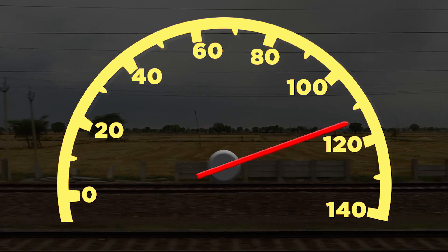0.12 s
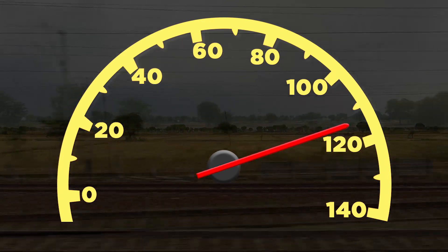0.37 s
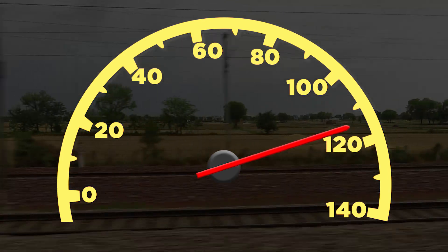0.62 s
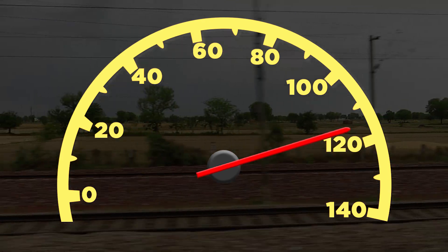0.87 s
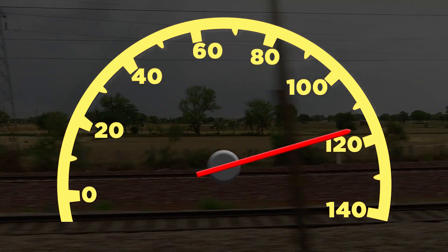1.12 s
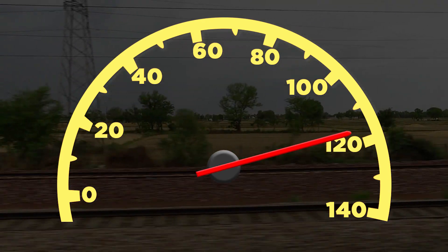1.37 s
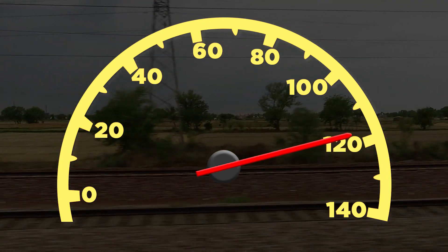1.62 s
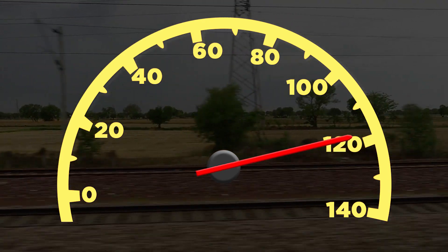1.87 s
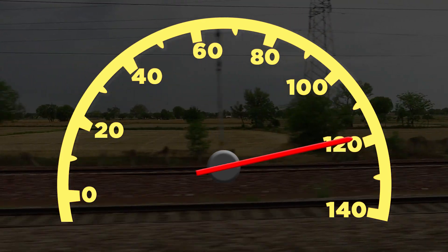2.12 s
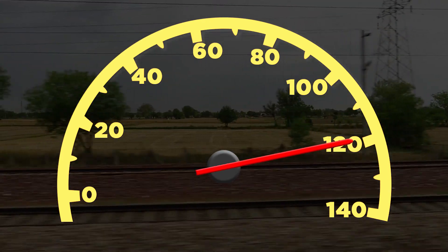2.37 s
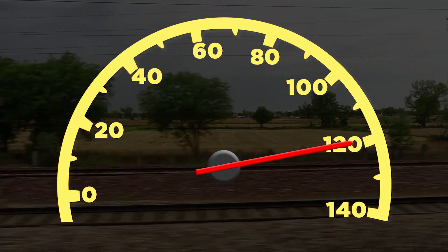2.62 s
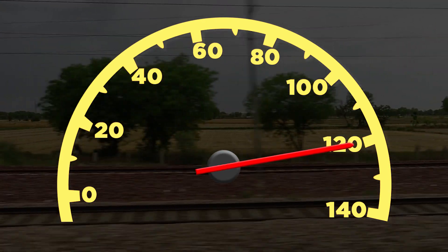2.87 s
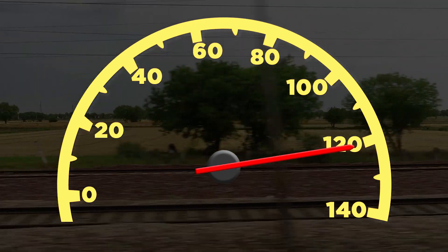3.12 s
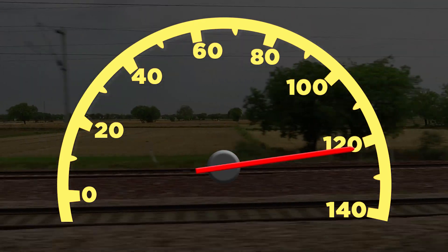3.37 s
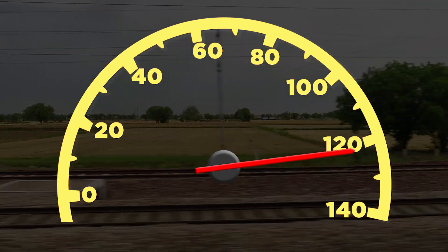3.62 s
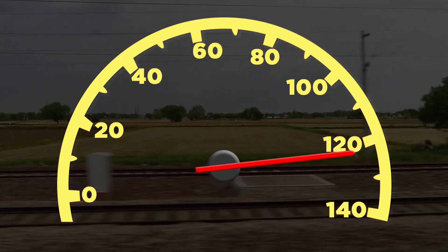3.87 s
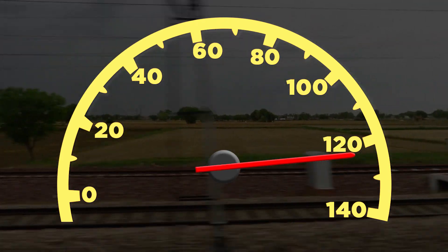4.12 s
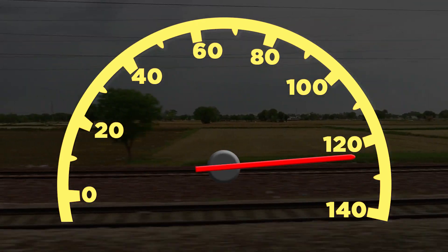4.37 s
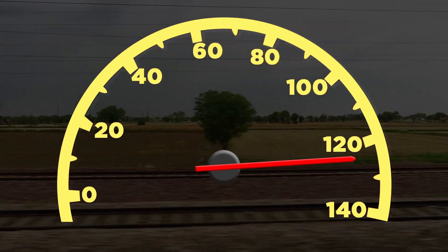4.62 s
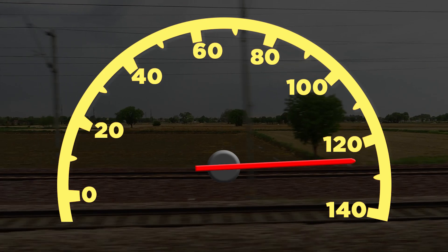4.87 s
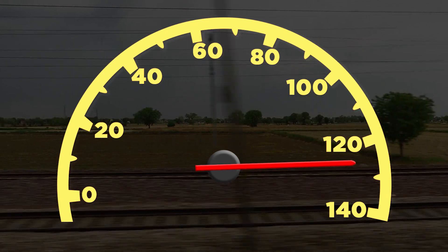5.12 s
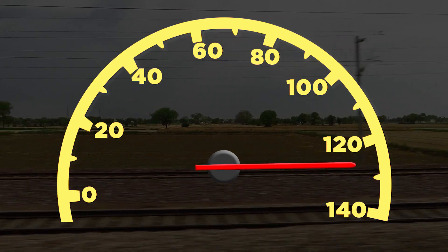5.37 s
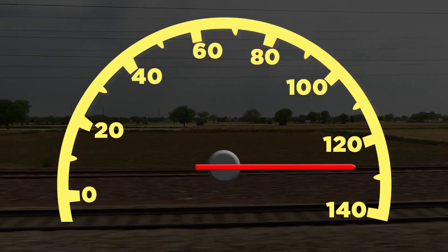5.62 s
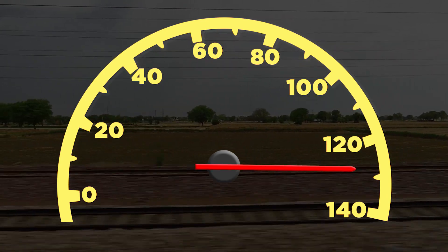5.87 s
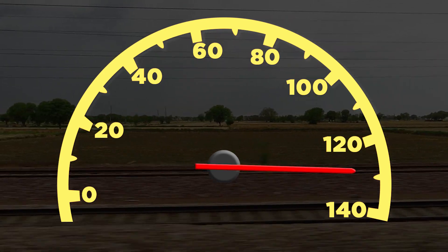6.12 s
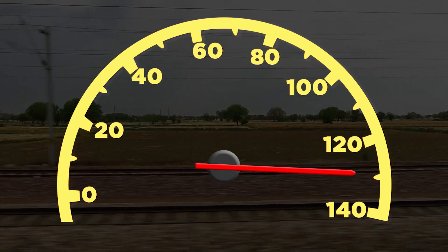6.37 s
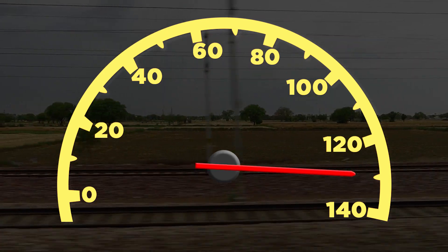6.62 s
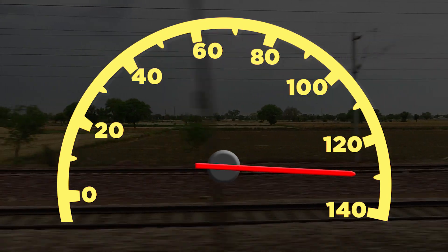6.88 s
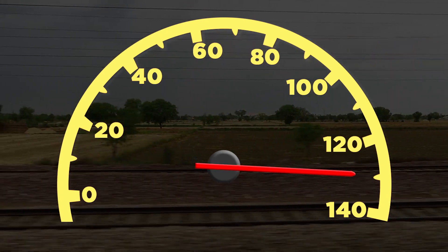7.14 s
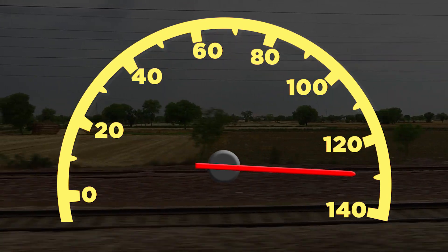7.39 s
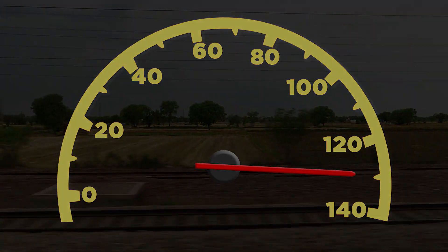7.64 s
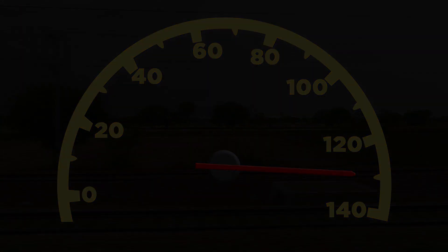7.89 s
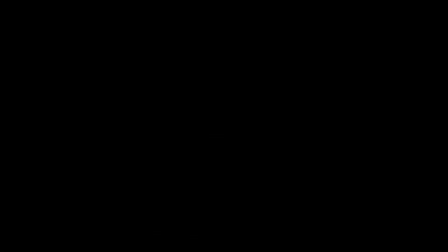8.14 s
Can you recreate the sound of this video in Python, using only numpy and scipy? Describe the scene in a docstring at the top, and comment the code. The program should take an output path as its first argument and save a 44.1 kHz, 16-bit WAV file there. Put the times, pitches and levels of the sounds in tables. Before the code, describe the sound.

Continuous engine noise from a powerful diesel train at full load: fast low exhaust pulses, buzzing gears, humming pumps and fans, and rushing machine noise. A piercing, steady-pitched turbo whistle waxes and wanes over it with airy high hiss. The microphone is close to the machinery, the image narrow and without noticeable echo. The sound holds steady, then fades out around eight seconds.

```python
"""A deep, fast throb leads: a big diesel locomotive engine at steady full load, heard close by, fading at the end.
Exhaust, gear and pump tones are sums of sines, most of them on multiples of the engine cycle.
The turbocharger whines with sines on its own shaft speed, under a resonant noise hiss near 8.3 kHz.
A broad machine roar of filtered noise fills in between, swelling band by band, in nearly mono stereo."""
import sys
import numpy as np
from scipy import signal
from scipy.fft import rfft, irfft, next_fast_len
from scipy.io import wavfile
from scipy.ndimage import map_coordinates

SR = 44100
rng = np.random.default_rng(int(sys.argv[2]) if len(sys.argv) > 2 else 0)


def natural_amplitude(level_db):
    """Convert a level in decibels to a linear amplitude factor, elementwise."""
    exponent = np.asarray(level_db, float) / 20
    return 10 ** exponent


def bounce(signal):
    """Save signal as a 16-bit WAV file at the path given by the first command-line argument."""
    frames = np.transpose(np.atleast_2d(signal))
    limited = np.clip(frames, -1, 1)
    pcm = np.round(limited * 32767).astype(np.int16)
    wavfile.write(sys.argv[1], SR, pcm)


N = 364266
T = np.arange(N) / SR
M = next_fast_len(N)  # spectrum length, samples
HZ = np.maximum(np.arange(M // 2 + 1) * SR / M, 1)  # frequency of each spectrum bin
CYCLE_HZ = 9.4404  # engine cycles per second


def on_bins(hz, value):
    """A curve over frequency, read at every spectrum bin along a logarithmic pitch axis."""
    return np.interp(np.log(HZ), np.log(hz), value)


def walk(rate_hz):
    """Smooth random drift through about rate_hz new values a second, with a spread near 1."""
    count = int(N / SR * rate_hz) + 4
    values = rng.standard_normal(count)
    drift = map_coordinates(values, [1 + T[::64] * rate_hz], order=3)
    return drift.repeat(64)[:N]


def tones(rows, turns, wander_db, rate_hz, lag=None):
    """Sines on multiples of a turning phase, each wavering in level; random phases unless a lag is given."""
    out = np.zeros(N)
    for multiple, level_db in rows:
        start = rng.uniform(0, 2 * np.pi)
        if lag is not None:
            start = lag(multiple)
        gain = np.sqrt(2) * natural_amplitude(level_db + wander_db * walk(rate_hz))
        out += gain * np.cos(2 * np.pi * multiple * turns + start)
    return out


def duct_lag(order):
    """Exhaust phase: orders below the duct resonance lead, those above lag, so each cycle starts sharply
    and dies away."""
    duct_hz, duct_width_hz = 77.5, 9.0
    if order == 16:
        # the firing wave steepens like a saw, which ties order 16 a quarter turn to order 8
        return 2 * duct_lag(8) + np.pi / 2
    # doubled for two silencer chambers in a row
    return -2 * np.arctan(2 * (order * CYCLE_HZ - duct_hz) / duct_width_hz)


def exhaust(cycle):
    """Exhaust and block tones on the engine orders; the low ones and order 16 take their phase from the duct."""
    # exhaust and block tones before the layer gain: order [multiple of the cycle rate], level_db [dB rms]
    firing = [(4, -57), (5, -48), (6, -44), (7, -36), (8, -17), (9, -21), (10, -34), (12, -37), (14, -46),
              (15, -37), (16, -32), (17, -41), (19, -42), (20, -48), (22, -43), (23, -35), (24, -42),
              (25, -42), (30, -48), (32, -49), (33, -48), (34, -45), (38, -49), (41, -47), (42, -56),
              (43, -54), (44, -52), (45, -55), (49, -56)]
    ducted = [row for row in firing if row[0] <= 12 or row[0] == 16]
    loose = [row for row in firing if row[0] > 12 and row[0] != 16]
    throb = tones(ducted, cycle, wander_db=0.25, rate_hz=3.0, lag=duct_lag)
    upper = tones(loose, cycle, wander_db=0.6, rate_hz=3.0)
    return natural_amplitude(0.36) * (throb + upper)


def gear_train(cycle):
    """Gear teeth sing on high multiples of the cycle; one group lines up into a surge once per cycle."""
    # gear train tones before the layer gain: order [multiple of the cycle rate], level_db [dB rms]
    gear_tones = [(60, -48), (63, -50), (65, -48), (66, -44), (68, -45), (70, -41), (71, -41), (72, -45),
                  (74, -36), (75, -44), (77, -44), (79, -27), (80, -37), (81, -42), (82, -49), (83, -42),
                  (84, -49), (88, -48), (91, -48), (92, -44), (95, -50), (96, -50), (99, -50), (100, -48),
                  (105, -50), (113, -42), (157, -50), (158, -49)]
    # driven shaft tones before the layer gain: order [multiple of the shaft's own rate], level_db [dB rms]
    driven_tones = [(54, -49), (55, -42), (56, -43), (57, -42), (59, -38), (60, -41), (81, -42), (82, -48),
                    (115, -51)]
    low, high = 74, 83  # orders of the surging group
    surge_cycle = 0.9  # point of each cycle where they line up
    twisted = cycle + 0.0015 * walk(0.6)  # the gear train winds up and lets go a little
    surging = [row for row in gear_tones if low <= row[0] <= high]
    steady = [row for row in gear_tones if not low <= row[0] <= high]
    surge = tones(surging, twisted, wander_db=0.6, rate_hz=4.0,
                  lag=lambda order: -2 * np.pi * order * surge_cycle)
    gears = tones(steady, twisted, wander_db=0.6, rate_hz=4.0)
    driven = tones(driven_tones, cycle * 79 / 58, wander_db=0.8, rate_hz=4.0)  # geared 79:58 to the cycle
    return natural_amplitude(0.9) * (surge + gears + driven)


def engine():
    """Exhaust and gears locked to the engine cycle, plus auxiliaries humming at fixed pitches."""
    # pumps and fans on their own speeds: pitch_hz [Hz], level_db [dB rms]
    auxiliaries = [(115.5, -38.5), (173.6, -36.5), (286.7, -36.5), (346.5, -45.5), (761.7, -45.5)]
    cycle_start_s = 0.006
    cycle = CYCLE_HZ * (T - cycle_start_s)
    return exhaust(cycle) + gear_train(cycle) + tones(auxiliaries, T, wander_db=0.86, rate_hz=2.0)


def blade(turns, level_db, rock, flutter):
    """A blade or tooth tone that the engine cycle rocks in phase and level, fluttering in the air stream."""
    rock_lean = 1.05  # radians: 0 rocks the level alone, a quarter turn the phase alone
    start = rng.uniform(size=20)
    sides = 0
    for offset, side_db in rock:
        # opposite offsets share one starting point of the rocking
        rocking = offset * CYCLE_HZ * T + np.sign(offset) * start[abs(offset)]
        sides = sides + np.exp(1j * rock_lean) * natural_amplitude(side_db) * np.exp(2j * np.pi * rocking)
    shaky = np.exp(1j * 0.25 * walk(30.0) + flutter * walk(55.0))  # phase, then level
    carrier = np.exp(2j * np.pi * turns)
    return np.sqrt(2) * natural_amplitude(level_db) * np.real((1 + sides) * shaky * carrier)


def turbo_whine():
    """Free-running turbocharger shaft: two bladed wheels, a tooth tone and weaker multiples of its speed."""
    # levels before rocking and flutter, waxing and waning apart:
    # time_s [s], blades_34_db [dB rms], blades_53_db [dB rms], teeth_29_db [dB rms]
    tone_levels = [(0.0, -29, -37, -49), (0.6, -29.5, -41, -50), (1.0, -34, -38, -53),
                   (1.25, -33.5, -35.5, -54), (1.6, -32, -34.5, -51), (2.0, -32, -35, -51),
                   (2.35, -32, -29.5, -47), (2.8, -34, -33, -49.5), (3.4, -32.5, -32, -44.5),
                   (4.1, -31.5, -40, -47.5), (4.45, -36.5, -40.5, -45.5), (4.85, -35.5, -36, -48),
                   (5.03, -45.5, -40.5, -48.5), (5.17, -37.5, -36.5, -46), (5.35, -33, -36.5, -46.5),
                   (5.8, -35.5, -37.5, -46), (6.1, -31.5, -39.5, -47), (6.6, -36, -37, -47),
                   (7.1, -38.5, -37.5, -53), (7.6, -34, -38, -49)]
    # other shaft tones: multiple [of the shaft rate], level_db [dB rms]
    shaft_tones = [(1, -37), (17, -47), (57.48, -62), (68, -69)]
    # side tones by which the firings rock each tone: offset [cycle rates], level_db [dB against the tone]
    rock_34 = [(-18, -26), (-13, -26), (-8, -24), (-7, -26), (-3, -21), (-1, -13), (1, -22), (8, -17),
               (11, -19)]
    rock_53 = [(-16, -19), (-8, -14), (8, -9), (16, -20)]
    rock_29 = [(-11, -8), (-8, -13), (11, -14)]
    shaft_hz, wander_hz = 157.64, 0.03  # turns per second, and their slow drift
    turns = np.cumsum(shaft_hz + wander_hz * walk(0.99)) / SR
    time_s, *columns = np.transpose(tone_levels)
    first_db, second_db, tooth_db = (np.interp(T, time_s, column) for column in columns)
    whine = blade(34 * turns, first_db, rock_34, flutter=0.08)
    whine += blade(53 * turns, second_db, rock_53, flutter=0.38)
    whine += blade(29.07 * turns, tooth_db, rock_29, flutter=0.25)
    return whine + tones(shaft_tones, turns, wander_db=2.1, rate_hz=3.1)


def resonant_hiss():
    """Hiss rings in a resonance near 8.3 kHz, falls away above it and pulses with the engine cycle."""
    # hiss level before pulsing: time_s [s], level_db [dB rms]
    hiss_levels = [(0.0, -39), (0.55, -40), (1.0, -37.5), (1.9, -37), (2.35, -35), (2.8, -36.5), (4.0, -37),
                   (5.2, -37.5), (5.6, -40), (5.85, -39), (7.6, -40)]
    centre_hz, width_hz = 8330.0, 300.0
    hiss_db = np.interp(T, *np.transpose(hiss_levels))
    peak = 1 / (1 + 2j * (HZ - centre_hz) / width_hz)
    peak = peak / (1 + (HZ / 9600.0) ** 8)  # trims the skirt above the resonance
    hiss = irfft(rfft(rng.standard_normal((2, M))) * peak)[:, :N]
    pulse_db = 0.9 * walk(40.0) + 0.4 * np.cos(2 * np.pi * CYCLE_HZ * (T - 0.07))
    common, apart = hiss / hiss.std() * natural_amplitude(hiss_db + pulse_db)
    return common, apart, hiss_db - np.mean(hiss_db)  # last: the slow swing of the hiss in dB


def roar(effort_db):
    """Octave bands of noise that swell apart and puff with the firings; the top follows the hiss level."""
    # exhaust and body noise before casing and swell: pitch_hz [Hz], density_db [dB per Hz]
    rumble_curve = [(22, -60.5), (35, -64), (50, -60), (75, -50), (105, -55), (130, -55.5), (190, -52.5),
                    (250, -56.5), (340, -58.5), (440, -66.5), (492, -68.5), (530, -62.5), (740, -52.5),
                    (1050, -60), (1240, -72)]
    # fan and intake noise before casing and swell: pitch_hz [Hz], density_db [dB per Hz]
    fan_curve = [(1240, -74), (1500, -60.5), (1850, -64), (2020, -72), (2350, -61.5), (2650, -60),
                 (2820, -64.5), (3300, -65.5), (4000, -72.5), (5000, -75), (7000, -85.5), (9500, -91.5),
                 (11500, -90), (12500, -99), (15500, -96)]
    # narrow casing resonances excited by the noise: pitch_hz [Hz], width_hz [Hz], gain_db [dB, each alone]
    casing = [(746, 20, 7), (1044, 27, 1), (1410, 110, 5.5), (5410, 96, 10.5), (5940, 250, -0.5),
              (6200, 180, 4.5), (12650, 300, 6), (13350, 440, 9), (14000, 350, 3)]
    rumble_db = on_bins(*np.transpose(rumble_curve))
    fan_db = on_bins(*np.transpose(fan_curve))
    density_db = np.where(HZ < fan_curve[0][0], rumble_db, fan_db)
    ring = 1
    for pitch_hz, width_hz, gain_db in casing:
        ring = ring + (natural_amplitude(gain_db) - 1) / (1 + (2 * (HZ - pitch_hz) / width_hz) ** 2)
    # the square root turns unit white noise into unit power per Hz
    noise = rfft(rng.standard_normal((2, M))) * natural_amplitude(density_db) * ring * np.sqrt(SR / 2)
    puff = np.cos(2 * np.pi * 8 * CYCLE_HZ * T)
    shared = walk(9.0)
    out = 0
    for centre_hz in 30 * 2.0 ** np.arange(10):
        # neighbouring octaves crossfade
        share = np.cos(np.pi / 2 * np.clip(np.log2(HZ / centre_hz), -1, 1)) ** 2
        swell_db = 0.18 * shared + 0.72 * walk(12.0) + 0.28 * puff
        swell_db = swell_db + np.clip(centre_hz / 5900.0, 0, 1) * effort_db
        out = out + irfft(noise * share)[:, :N] * natural_amplitude(swell_db)
    return out


def scene():
    """Nearly mono stereo: a filtered copy of the centre and some other noise make the sides."""
    # half the left-right difference against the centre; some bands are almost mono:
    # pitch_hz [Hz], in_step [share], quarter [share, a quarter turn ahead], unrelated_db [dB, noise gain]
    stereo_width = [(40, .01, -0.0041, -14.5), (100, 0, -0.044, -30), (347, -0.052, -0.063, -18),
                    (504, -.1, -.01, -17.5), (750, -.15, -.01, -22.5), (1215, -0.058, -.01, -18.5),
                    (1300, 0, 0, -42.5), (1680, -0.019, 0, -28.5), (1860, -0.11, -0.17, -18),
                    (2050, 0.204, 0.4, -10), (2280, -0.011, 0, -38.5), (3200, -0.016, -.02, -24),
                    (4000, 0, -0.088, -29), (4250, .09, 0.2, -14), (4800, 0.043, 0.34, -19),
                    (5200, 0, 0, -3.5), (6100, -0.065, 0, -23.5), (7000, 0, 0, -32),
                    (7700, -.05, -.3, -13.5), (8800, -.05, -0.27, -15), (9300, 0, 0, -21.5),
                    (12200, 0.021, 0, -4), (13100, -.05, -.55, -4), (14300, 0, -.2, -6),
                    (14700, 0.018, 0, -37)]
    hiss, hiss_apart, effort_db = resonant_hiss()
    roar_common, roar_apart = roar(effort_db)
    mid = rfft(engine() + turbo_whine() + hiss + roar_common, M)
    hz, in_step, quarter, unrelated_db = np.transpose(stereo_width)
    side = mid * (on_bins(hz, in_step) + 1j * on_bins(hz, quarter))
    side = side + rfft(roar_apart + hiss_apart, M) * natural_amplitude(on_bins(hz, unrelated_db))
    return irfft(np.array([mid + side, mid - side]), M)[:, :N]


def roll_off(x):
    """The treble ends steeply here."""
    return signal.sosfilt(signal.butter(12, 15680, fs=SR, output="sos"), x)


def record(dry):
    """The finished mix fades to silence along a quarter sine."""
    fade_start_s, fade_end_s, fade_power = 7.05, 8.037, 1.05
    left = np.clip((fade_end_s - T) / (fade_end_s - fade_start_s), 0, 1)  # share of the fade still to come
    mix = dry * np.sin(np.pi / 2 * left) ** fade_power
    return roll_off(mix)


dry = scene()
out = record(dry)
bounce(out)
```